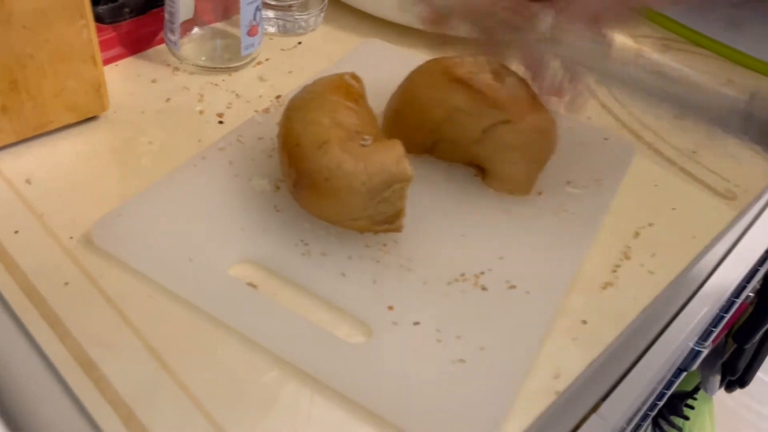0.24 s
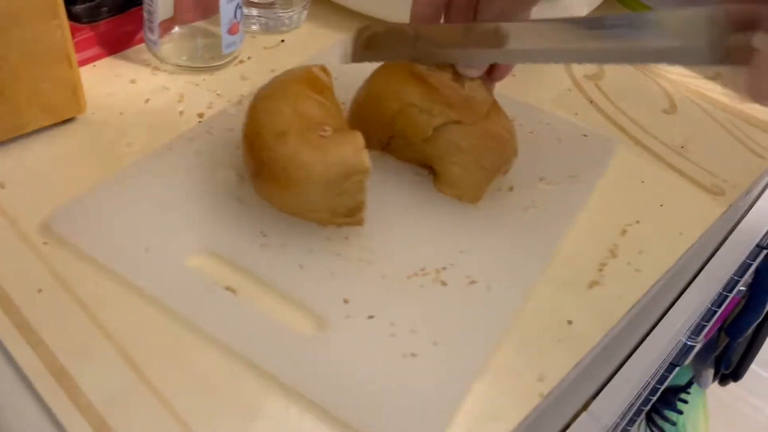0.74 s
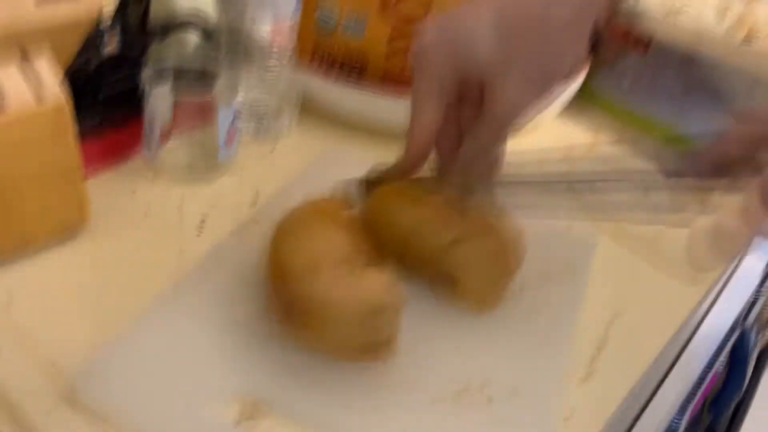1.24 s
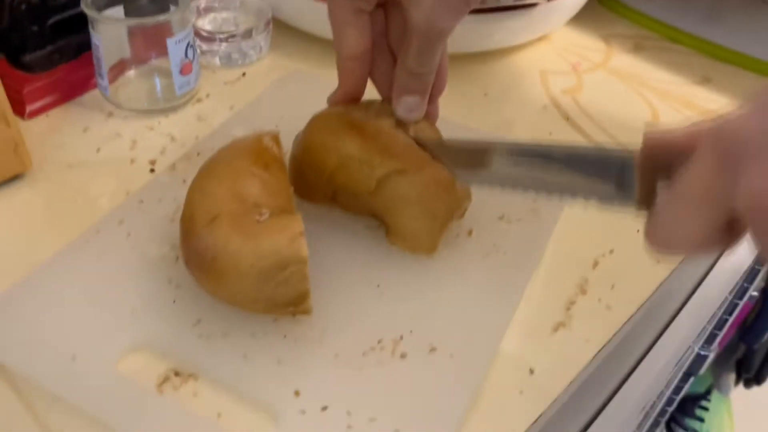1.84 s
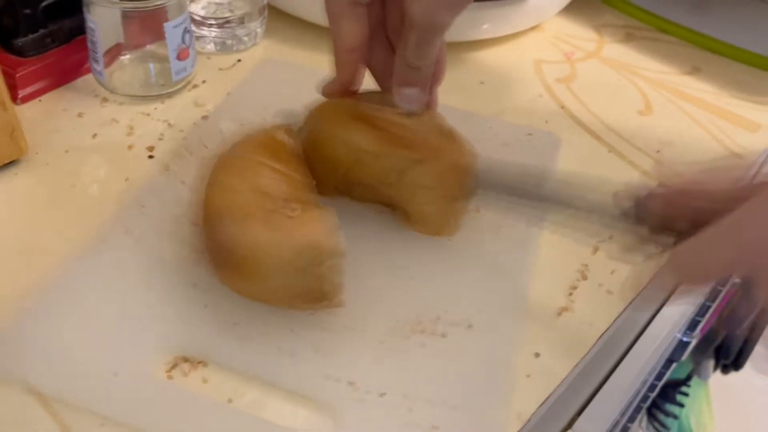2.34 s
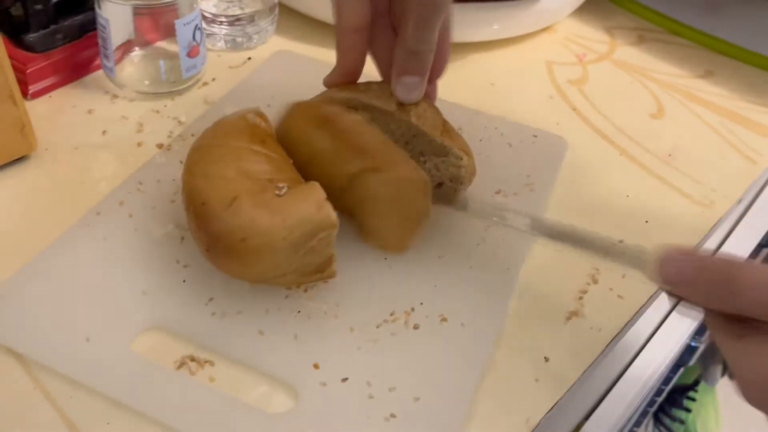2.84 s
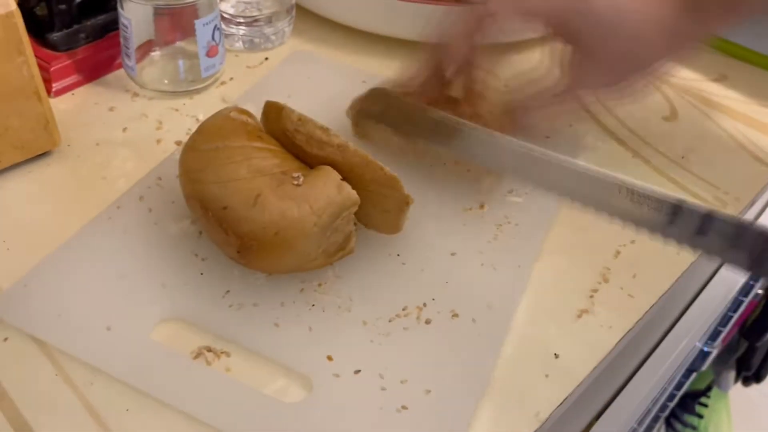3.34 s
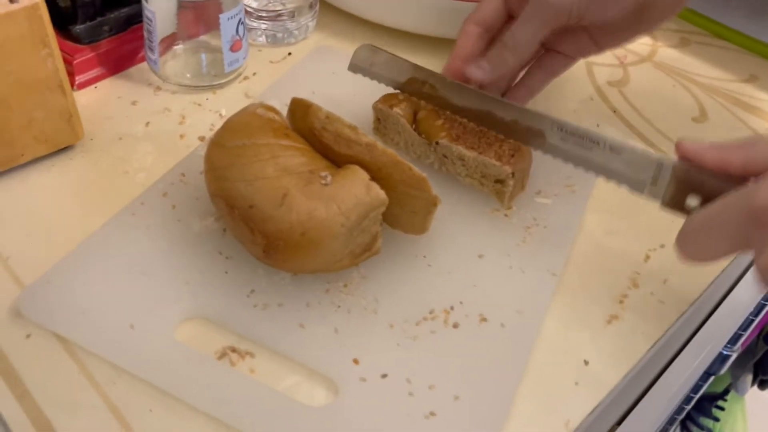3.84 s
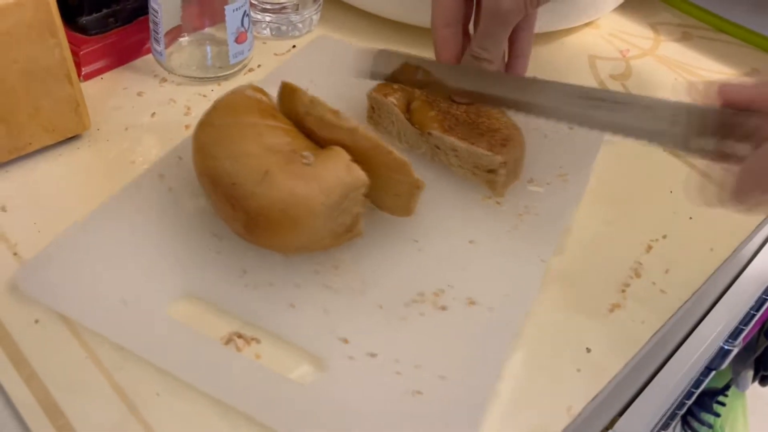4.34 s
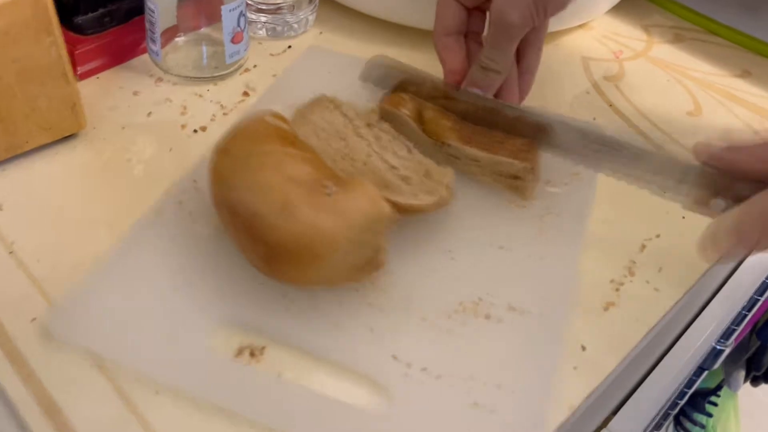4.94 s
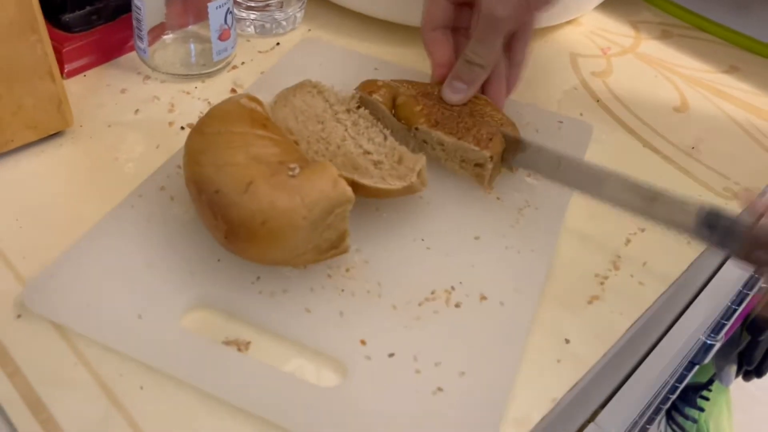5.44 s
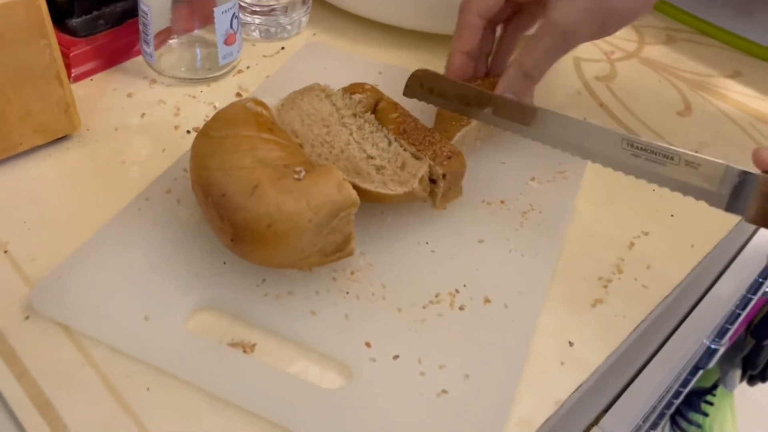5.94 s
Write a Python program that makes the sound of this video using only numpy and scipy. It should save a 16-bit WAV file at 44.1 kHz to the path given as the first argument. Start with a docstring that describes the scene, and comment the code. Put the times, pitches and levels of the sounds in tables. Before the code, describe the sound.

Close, rough sawing of a blade in dry crusty bread, in two bursts split by soft clunks as pieces are repositioned on a plastic board.

```python
"""A serrated knife saws fast through a stale bread roll on a plastic board, close to a two-port phone.
Random grains of slip and breakage, gated by each stroke, ring board, crust and cut slot and spray crumbs.
Crust snaps are noise bursts and taps; rasps ring a note and overtone; knocks strike board and crust.
Hand pushes and bumps ring the counter. The roll is also set down and nudged.
Low shaped noise is the hum of a small quiet kitchen."""
import sys
import numpy as np
from scipy import signal
from scipy.fft import rfft, irfft
from scipy.io import wavfile
from scipy.ndimage import uniform_filter1d

SR = 44100
rng = np.random.default_rng(int(sys.argv[2]) if len(sys.argv) > 2 else 0)


def undo_db(level):
    """Turn decibels back into plain size, where 20 dB means ten times bigger."""
    steps = np.asarray(level, float) / 20
    return 10 ** steps


def generate_wav(signal):
    """Clip the signal to [-1, 1] and save it as 16-bit WAV at the path in sys.argv[1]."""
    frames = np.transpose(np.atleast_2d(signal))
    scaled = np.clip(frames, -1, 1) * 32767
    pcm = np.round(scaled).astype(np.int16)
    wavfile.write(sys.argv[1], SR, pcm)


N = 273420
T_S = np.arange(N) / SR
FREQ_HZ = np.fft.rfftfreq(N, 1 / SR)


# blade or roll dragging between bites: (time [s], relative level [dB])
DRAG = [(0.0, -77.5), (0.5, -78), (0.71, -77), (0.9, -59), (1.0, -52.5), (1.52, -50.5), (1.64, -48),
        (1.78, -67.5), (2.0, -57.5), (2.64, -52.5), (2.93, -54.5), (3.09, -92), (3.38, -69.5),
        (3.55, -80.5), (4.18, -84), (4.3, -72), (4.36, -59), (4.43, -51.5), (4.97, -49), (5.16, -57.5),
        (5.3, -49.5), (5.45, -47.5), (5.63, -88), (6.2, -78)]
HISS_RE_DRAG_DB, HISS_DEEP_DB = -11.5, -4  # fine crumbs under the drag; muffling per unit of depth


def saw(clumps):
    """Teeth slip, crust breaks and crumbs fly at bite pressure; slow bodies lag their force."""
    bite_clumps, coarse_clumps, fine_clumps, spot_shift = clumps
    deep = depth()
    drag = undo_db(2 * np.interp(T_S, *np.transpose(DRAG)))  # power
    hiss = drag * undo_db(2 * (HISS_RE_DRAG_DB + HISS_DEEP_DB * deep))
    slips, breaks = grains(700, 1.49), grains(2000, 1.1)
    dust, fines = grains(7000, 2.6), grains(11000, 1.6)
    ticks = grains(65, 1.4)  # a tooth flicks a hard crumb

    press = swell(column=3, early_ms=8.3)
    judder = played(slips + 0.84 * breaks, np.sqrt(press + 0.3 * drag), board)

    bite = bite_clumps * np.sqrt(swell(column=4, early_ms=1.1) + 0.24 * drag)
    crunch = played(breaks + 0.41 * slips, bite * np.sqrt(1 - deep), lambda f: crust(f, spot_shift))
    slot_ring = played(breaks, bite * np.sqrt(deep), slot)

    # coarse and fine crumbs come loose in their own clumps
    coarse = uniform_filter1d(dust * coarse_clumps, size=3)
    fine = fines * fine_clumps
    fine = fine - uniform_filter1d(fine, size=3)
    spray = 1.1 * coarse + fine + 0.054 * breaks + 0.15 * ticks
    spray_gain = bite_clumps * np.sqrt(swell(column=5, early_ms=0) + hiss)
    crumb_spray = played(spray, spray_gain, crumbs)

    # the judder also passes through the board into the counter
    rumble_gain = np.sqrt(0.64 * press + 0.97 * drag)
    rumble = played(slips, rumble_gain, lambda f: counter(uniform_filter1d(f, size=60)))
    return judder + crunch + slot_ring + crumb_spray + rumble


# strokes of the blade through the roll:
# (time [s], length [ms], board level [dB], crust level [dB], crumb level [dB])
STROKES = [(0.701, 78, -71, -64.5, -69), (0.737, 23.4, -44.5, -51, -54), (0.765, 32, -46.5, -56, -61),
           (0.801, 30, -46.5, -55, -59), (0.842, 36, -42, -57.5, -59.5), (0.911, 41, -42, -71, -49),
           (0.947, 60, -47.5, -49, -51), (0.975, 34, -38.5, -63, -54.5), (1.047, 34, -40, -46.5, -51),
           (1.121, 63, -39, -47.5, -52), (1.195, 31.5, -35, -43.5, -44), (1.268, 39, -40, -54, -51.5),
           (1.341, 25, -37.5, -43.5, -45), (1.382, 38, -56, -54, -57), (1.421, 21, -46, -40.5, -46),
           (1.501, 40, -43.5, -49, -51.5), (1.571, 30, -42.5, -46, -50.5), (1.646, 27, -44, -43.5, -46),
           (1.729, 45, -50, -53, -58.5), (1.777, 31, -48.5, -49, -56), (1.82, 33, -47, -54, -62),
           (1.865, 21.4, -46.5, -55, -63.5), (1.945, 10, -46, -61, -61.5), (2.005, 50, -53, -55.5, -55.5),
           (2.064, 61, -53, -57.5, -69), (2.154, 26, -47.5, -51, -63), (2.228, 55, -49.5, -52.5, -59.5),
           (2.301, 43, -36, -44, -55), (2.383, 42, -52, -52, -54), (2.449, 58, -46.5, -48.5, -59),
           (2.506, 47, -51, -50.5, -56.5), (2.576, 22.5, -42.5, -42.5, -57), (2.609, 39, -45.5, -47, -59),
           (2.717, 29, -43.5, -54.5, -75), (2.758, 23, -49, -42.5, -53.5), (2.827, 26, -54, -54, -58),
           (2.867, 40, -49, -49.5, -60.5), (4.31, 36, -38, -51.5, -61), (4.417, 38, -40, -49.5, -54),
           (4.446, 16.3, -30.5, -42, -45), (4.514, 17, -40.5, -48, -45), (4.564, 108, -44, -48.5, -53),
           (4.66, 27.4, -32, -43.5, -47), (4.698, 57, -52, -56, -53), (4.73, 25, -40, -46, -47.5),
           (4.803, 33.4, -33.5, -40, -45), (4.953, 42, -34.5, -39, -48), (5.088, 40.7, -34, -38, -47.5),
           (5.122, 33, -44.5, -47, -47), (5.197, 35, -49, -57, -57), (5.237, 38, -54, -56, -57),
           (5.275, 29, -43.5, -49, -53), (5.396, 41, -38, -43, -56.5), (5.425, 18, -60, -40, -45),
           (5.482, 51, -71, -47, -61), (5.56, 77, -56.5, -58, -67), (5.634, 43, -47, -53.5, -69.5)]
# the roll set down, turned and slid: (time [s], rise [ms], fall [ms], board level [dB], crust level [dB])
NUDGES = [(0.175, 16.7, 12, -33.5, -40), (0.283, 14.4, 25, -46.5, -51.5), (0.409, 20.3, 12, -44, -60),
          (0.456, 25, 9.7, -62, -72.5), (0.533, 18.4, 4, -34.5, -49), (2.985, 18, 13.5, -40.5, -55.5),
          (3.059, 13, 33, -59.5, -61), (3.098, 18, 16.6, -50, -64), (3.316, 3, 17, -62, -65),
          (3.355, 25, 34, -69, -73), (3.4, 4.7, 20, -41, -48.5), (3.45, 15, 16.7, -40, -53.5),
          (3.594, 22.4, 12, -52.5, -62.5), (3.673, 23, 15.5, -54, -64.5), (3.76, 16, 19.4, -56, -65.5),
          (3.81, 15, 11, -61, -85), (3.889, 18, 13, -62.5, -69.5), (3.954, 12, 13, -73, -72.5),
          (4.101, 16, 7.3, -56, -65.5), (4.187, 17, 16, -53, -68.5), (4.264, 13.4, 32, -53, -63),
          (5.722, 23, 9.5, -52, -57.5), (5.75, 27, 40, -58, -61.5), (5.828, 16, 17, -65, -65),
          (5.887, 29, 18, -57.5, -69), (5.964, 17, 16, -51.5, -64.5), (6.129, 21.8, 14.3, -42, -57.5),
          (6.192, 19, 10, -61, -62)]
RISE_SHARE = 0.55  # part of a stroke spent building pressure
NUDGE_CRUMBS_RE_CRUST_DB = -8  # crumbs rolling under a nudged roll


def contacts():
    """Strokes and nudges as rows of time, rise, fall and the levels of board, crust and crumbs."""
    strokes = [(s, RISE_SHARE * ms, (1 - RISE_SHARE) * ms, *dbs) for s, ms, *dbs in STROKES]
    nudges = [(*row, row[-1] + NUDGE_CRUMBS_RE_CRUST_DB) for row in NUDGES]
    return strokes + nudges


def swell(column, early_ms):
    """Contact pressure, added in power: bell up, trailing fall, peak early_ms before the contact time."""
    power = np.zeros(N)
    for row in contacts():
        time_s, rise_ms, fall_ms = row[:3]
        i = slice(max(int((time_s - .15) * SR), 0), int((time_s + .15) * SR))
        ms = 1000 * (T_S[i] - time_s) + early_ms
        rise = (ms / max(rise_ms - early_ms, 2)) ** 2
        fall = np.abs(ms / fall_ms) ** 1.5
        power[i] += undo_db(2 * row[column]) * np.exp(-1.6 * np.where(ms < 0, rise, fall))
    return power


def played(force, gain, body):
    """Drive a body with a force whose strength follows gain; a steady force gives rms 1."""
    return body(force * gain) / np.sqrt(np.mean(body(force) ** 2))


def grains(rate_hz, spread_db):
    """Random clicks, many small and few large."""
    size = undo_db(spread_db * np.minimum(rng.exponential(size=N), 4.5)) * rng.standard_normal(N)
    return unit(size * (rng.random(N) < rate_hz / SR))


def patches(rate_hz, patchy_db):
    """The crust gives way in clumps: a random gain held for 1 / rate_hz and slewed."""
    hold = int(SR / rate_hz)
    steps = np.repeat(rng.standard_normal(N // hold + 1), hold)
    return unit(undo_db(patchy_db * uniform_filter1d(steps, hold // 3 + 1)[:N]))


# the two cuts: (blade enters [s], full depth [s], slice parts [s], added depth at full [share 0-1])
CUTS = [(1.9, 2.704, 3.05, 0.24), (4.9, 5.507, 5.23, 0.55)]
SHALLOW = 0.25  # share of slot ring outside a deep cut


def depth():
    """Slot share: each cut ramps it up; the first ramps back, the second parts short of full depth."""
    # the second cut's times are out of order: its ramp drops straight to 0 at parting
    return np.clip(SHALLOW + sum(np.interp(T_S, row[:3], (0, row[3], 0)) for row in CUTS), 0, 1)


# plastic board resonances: (frequency [Hz], width [Hz], level [dB])
BOARD = [(227.6, 19.5, -4), (283.4, 27, -2.5), (369, 46, -4.5), (447, 74.4, -3.5), (505, 44, -0.5),
         (585, 42.6, -6.5), (713, 47.5, -5.5), (808, 30, -2.5)]
# the board note that the grip favours: (time [s], frequency [Hz])
GRIP = [(0.0, 425), (0.22, 404), (0.31, 250), (1.76, 297), (2.5, 340), (2.61, 392), (2.7, 296), (4.37, 248),
        (4.83, 304), (4.92, 435), (5.27, 300), (5.36, 395), (5.65, 304), (5.97, 257), (6.1, 384),
        (6.2, 343)]


def board(force):
    """Plastic board: resonances near the grip's favoured note ring hardest."""
    return ring(force, BOARD, np.interp(T_S, *np.transpose(GRIP)), octaves=0.7)


# dry crust resonances: (frequency [Hz], width [Hz], level [dB])
CRUST = [(860, 264, 4), (1118, 91, 2), (1193.6, 66, 5.5), (1297, 320, 2), (1626, 193, 1.5), (1910, 263, -1),
         (2110, 248, 3), (2827, 403, 2), (2990, 41, 0), (3265, 430, -2.5), (4420, 330, -2.5),
         (4930, 240, -5)]
CRUST_NOTE_HZ, CRUST_NOTE_DEEP_HZ = 1185, 1445  # favoured note at depth share 0 and 1


def crust(force, shift=1):
    """Hollow dry roll: depth and the spot under the teeth shift the favoured note."""
    note_hz = CRUST_NOTE_HZ + (CRUST_NOTE_DEEP_HZ - CRUST_NOTE_HZ) * depth()
    return ring(force, CRUST, shift * note_hz)


# resonances of the slot of the cut: (frequency [Hz], width [Hz], level [dB])
HOLLOW = [(1300, 260, 0), (2850, 520, -2)]


def slot(force):
    """Slot of the cut: its resonances act twice in series."""
    return ring(ring(force, HOLLOW), HOLLOW)


# crumb spectrum: (frequency [Hz], level [dB])
CRUMBS = [(2500, -3.5), (4000, -1.5), (5000, 0.5), (7000, 0.5), (9000, 0), (11000, 0), (13000, 1),
          (15500, -1), (16000, -43)]


def crumbs(force):
    """Bright spectrum of flying crumbs."""
    return colour(force, CRUMBS)


# single snaps of crust: (time [s], relative burst level [dB], relative crust tap level [dB])
SNAPS = [(0.151, -58, -40), (0.5104, -44, -43), (0.5205, -39.5, -43), (0.734, -34.5, -36),
         (0.766, -39, -57), (0.886, -32.5, -40), (0.929, -44, -49), (0.9456, -28, -39), (1.0365, -43, -45),
         (1.186, -50, -22), (1.336, -61, -42), (1.419, -44, -45), (1.6008, -40, -53), (1.6162, -39, -25),
         (1.637, -57, -40), (2.4324, -46, -49), (3.5743, -67, -33), (3.5915, -49.5, -24),
         (3.9538, -49.5, -66), (4.2618, -50, -39), (4.4393, -31, -42), (4.505, -39, -53),
         (4.5211, -45, -55), (4.5467, -35.5, -39), (4.726, -34.5, -26), (4.7963, -34.5, -29.5),
         (4.9294, -32, -37), (4.9463, -27.5, -31), (5.0446, -37.5, -24), (5.237, -33, -39),
         (5.356, -40, -51), (5.9623, -51.5, -30), (6.104, -58, -41), (6.129, -40.5, -59)]


def snaps():
    """Crust snaps: a bright noise burst decaying in 1.6 ms and a tap on the crust."""
    bright, tap = np.zeros(N), np.zeros(N)
    fade = np.exp(-np.arange(220) / SR / 0.0016)
    noises = rng.standard_normal((len(SNAPS), 220))
    for (time_s, burst_db, tap_db), noise in zip(SNAPS, noises):
        i = int(time_s * SR)
        bright[i:i + 220] += undo_db(burst_db) * 2.45 * unit(fade * noise) * np.std(fade)
        tap[i] += undo_db(tap_db) * np.sign(noise[0])
    return undo_db(-7) * crumbs(bright) + undo_db(9) * crust(tap)


# blade or cut face rubs and the hollow crumb sings: (time [s], length [ms], note [Hz], level [dB])
RASPS = [(2.6, 33, 1300, -51), (2.716, 34, 1240, -51), (2.865, 22, 1210, -53.5), (3.099, 27, 1230, -52.5),
         (3.452, 35, 1030, -54.5), (5.39, 34, 1330, -43.5), (5.482, 30, 1120, -52),
         (5.558, 22, 1200, -56.5), (5.637, 36, 1250, -59)]
RASP_WIDTH = 0.082  # share of the note
RASP_OVERTONE, RASP_OVERTONE_DB = 2.25, -7  # multiple of the note, level


def rasps():
    """Short rubs whose slips ring a note and its overtone."""
    out, slips = np.zeros(N), grains(1500, 2.3)
    for time_s, ms, hz, db in RASPS:
        i = slice(int((time_s - .08) * SR), int((time_s + .087) * SR))
        width_hz = RASP_WIDTH * hz
        notes = [(hz, width_hz, 0), (RASP_OVERTONE * hz, width_hz, RASP_OVERTONE_DB)]
        envelope = np.exp(-(2000 * (T_S[i] - time_s) / ms) ** 2)
        out[i] += undo_db(db) * envelope * unit(ring(slips[i], notes))
    return out


# solid knocks of roll and blade on the board:
# (time [s], relative board blow [dB], relative crust blow [dB], board note [Hz])
KNOCKS = [(0.169, -5.5, -26.5, 530), (0.178, -50, -27, 520), (0.277, -58, -45, 261),
          (0.408, -24.5, -45, 293), (0.515, -22, -33, 315), (0.529, -34, -31, 260),
          (0.692, -62, -43.5, 291), (1.181, -35, -37, 278), (2.284, -22, -67, 296),
          (2.566, -18.5, -59, 470), (2.744, -21, -49, 453), (2.983, -28, -33.5, 266),
          (3.098, -27, -39, 325), (3.315, -50, -47, 275), (3.397, -54, -26.5, 283),
          (3.415, -38, -31.5, 293), (3.439, -18, -58, 365), (3.456, -18, -55, 254),
          (3.752, -32.5, -70, 470), (5.076, -11.5, -43, 290), (5.357, -57, -27.5, 371),
          (5.38, -12, -32, 417), (5.895, -38.5, -81, 264), (6.11, -18.5, -61, 280),
          (6.118, -23.5, -60, 495)]
HELD_DAMPING = 2.8  # the hand and the roll widen the board's notes at a knock


def knocks():
    """One blow each into board and crust; the spot that is hit picks the board note."""
    low, high = np.zeros(N), np.zeros(N)
    for time_s, board_db, crust_db, _ in KNOCKS:
        i = int(time_s * SR)
        low[i], high[i] = undo_db(board_db), undo_db(crust_db)
    note_hz = np.interp(T_S, *np.transpose(sorted(KNOCKS))[[0, 3]])
    held_board = [(hz, HELD_DAMPING * width_hz, db) for hz, width_hz, db in BOARD]
    thud = undo_db(31.5) * ring(low, held_board, note_hz, octaves=0.25)
    # the board blow also rings the crust in a narrow range
    thud_crust = undo_db(15.5) * ring(low, CRUST, 992, octaves=0.14)
    crack = undo_db(17.5) * ring(high, CRUST, 2100, octaves=0.94)
    return thud + thud_crust + crack


# counter resonances: (frequency [Hz], width [Hz], level [dB])
COUNTER = [(49, 15, -17), (66.6, 18, 9), (97.6, 18.5, 5.5), (143, 38, 6)]


def counter(force):
    """Kitchen counter: a few bass resonances."""
    return ring(force, COUNTER)


# strongest pushes of the hand into the counter: (time [s], relative level [dB])
THUMPS = [(0.293, -42), (0.763, -43.5), (0.848, -52), (0.989, -37), (1.121, -38), (1.192, -44),
          (1.281, -40), (1.346, -35.5), (1.419, -42), (1.5, -35.5), (1.585, -35.5), (1.657, -36),
          (1.728, -38), (1.887, -47.5), (1.998, -46), (2.084, -42.5), (2.233, -43), (2.38, -46),
          (2.459, -42), (2.508, -41.5), (2.588, -48), (2.714, -48), (2.891, -42), (2.998, -40),
          (4.318, -37.5), (4.376, -40.5), (4.448, -35), (4.524, -47), (4.584, -37.5), (4.725, -34),
          (4.876, -40), (4.954, -32.5), (5.008, -33), (5.152, -37.5), (5.214, -39.5), (5.335, -41),
          (5.524, -44.5), (5.641, -52), (5.847, -52.5)]
# hard bumps of roll or blade, through the board into the counter: (time [s], relative level [dB])
BUMPS = [(0.185, -25.5), (0.409, -41), (0.525, -30), (1.818, -41), (2.155, -36), (3.415, -44), (3.454, -39),
         (3.598, -41.5), (3.679, -48.5), (3.756, -55), (4.012, -65), (4.2, -46), (4.804, -32.5),
         (5.435, -35), (5.901, -47), (5.961, -38), (6.136, -43)]
PUSH_MS, BUMP_MS, PUSH_LEAD_MS = 2.35, 0.81, 8.97  # bell widths (sigma); lead of push on table time


def thumps():
    """Pushes, down or up, a little before the counter's swing peaks: hand long and deep, bumps short."""
    force = np.zeros(N)
    rows = [(*row, PUSH_MS) for row in THUMPS] + [(*row, BUMP_MS) for row in BUMPS]
    for (time_s, db, ms), way in zip(rows, rng.standard_normal((len(rows), 1))):
        i = slice(int((time_s - .04) * SR), int((time_s + .03) * SR))
        bell = np.exp(-.5 * ((1000 * (T_S[i] - time_s) + PUSH_LEAD_MS) / ms) ** 2)
        force[i] += undo_db(db) * np.sign(way) * bell
    return undo_db(5) * counter(force)


# kitchen hum spectrum: (frequency [Hz], relative density [dB per Hz])
KITCHEN = [(18, -43), (30, 0), (81, 4), (584, -33), (844, -28), (1430, -41), (3310, -47), (6380, -44.5),
           (14800, -89), (16000, -79)]


def kitchen():
    """Quiet low hum of the room: shaped noise."""
    return undo_db(-61) * unit(colour(rng.standard_normal(N), KITCHEN))


def unit(x):
    """Scale to rms 1."""
    return x / np.sqrt(np.mean(x ** 2))


def colour(x, points):
    """Shape a spectrum by (Hz, dB) points, interpolated over log frequency."""
    hz, db = np.transpose(points)
    return irfft(rfft(x) * undo_db(np.interp(np.log(FREQ_HZ + 1), np.log(hz), db)), N)


def ring(x, modes, note_hz=None, octaves=1.):
    """Sum of resonances, those near the favoured note driven hardest; neighbours in opposite sense."""
    out = 0
    for k, (hz, width_hz, db) in enumerate(modes):
        reach = 1 if note_hz is None else 1 / (1 + (np.log2(hz / note_hz) / octaves) ** 2)
        mode = signal.lfilter(*signal.iirpeak(hz, hz / width_hz, SR), x * reach)
        out = out + (-1) ** k * undo_db(db) * mode
    return out


def tail(t60_s, count):
    """A decaying noise response of unit energy."""
    t = np.arange(count) / SR
    decay = np.exp(-np.log(1000) * t / t60_s)
    return unit(rng.standard_normal(count) * decay) / np.sqrt(count)


# path difference between the ports: (frequency [Hz], left lead [rad], likeness [0-1])
PORTS = [(0, 0, .996), (100, .04, .996), (180, .1, .99), (300, .5, .94), (690, .7, .85), (1200, .3, .7),
         (1720, -.8, .65), (2240, 0, .9), (3270, .8, .7), (4820, .1, .75), (5860, -2.5, .7),
         (6890, -3.9, .75), (8440, -6, .92), (9470, -6.4, .96), (11000, -8.1, .82), (12575, -9.4, .97),
         (14600, -11.1, .7), (15700, -12.3, .85), (22050, -18, .8)]
# level difference between the ports: (frequency [Hz], left minus right [dB])
LEFT_DB = [(60, 0), (400, 0), (700, 2.5), (1300, 3.5), (2400, 1.5), (4400, 1), (8000, 0)]


def ports(here, scattered):
    """Two ports: likeness sets the shared part, half the lead and level difference goes to each side."""
    hz, lead, alike = np.transpose(PORTS)
    lead = np.interp(FREQ_HZ, hz, lead)
    alike = np.clip(np.interp(FREQ_HZ, hz, alike), 0, 1)
    same = rfft(here) * np.sqrt((1 + alike) / 2)
    other = rfft(scattered) * np.sqrt((1 - alike) / 2)
    hz, db = np.transpose(LEFT_DB)
    left_db = np.interp(np.log(FREQ_HZ + 1), np.log(hz), db)
    tilt = undo_db(left_db / 2) * np.exp(.5j * lead)
    return np.array([irfft((same + other) * tilt, N), irfft((same - other) / tilt, N)])


def scene():
    """The sound at the phone: direct, with walls, and a scattered share that differs at the ports."""
    hits, pushes = snaps() + knocks() + rasps(), thumps()
    # bite strength, coarse crumbs, fine crumbs, spot under the teeth
    clumps = patches(90, 2.5), patches(40, -0.5), patches(40, 9), patches(25, 2)
    near = saw(clumps) + hits
    walls = undo_db(-15) * signal.fftconvolve(near, tail(0.13, count=16384))[:N]
    here = near + walls + pushes + kitchen()
    # other grains of the cut reach the ports by other paths
    scattered_hits = signal.fftconvolve(hits, tail(0.072, count=2048))[:N]
    scattered = saw(clumps) + scattered_hits + pushes + kitchen()
    return ports(here, scattered)


def low_pass(x):
    """Removes everything above the highest recorded frequency."""
    return signal.sosfilt(signal.butter(12, 16970, fs=SR, output="sos"), x)


def record(dry):
    """The microphone drops the deepest bass."""
    high_pass = signal.butter(2, 32, "high", fs=SR, output="sos")
    mix = signal.sosfilt(high_pass, dry)
    return low_pass(mix)


dry = scene()
out = record(dry)
generate_wav(out)
```